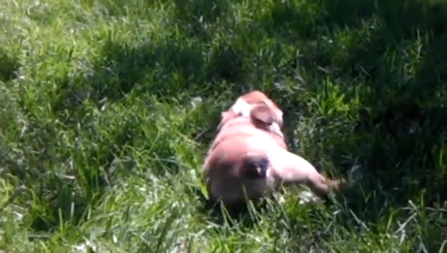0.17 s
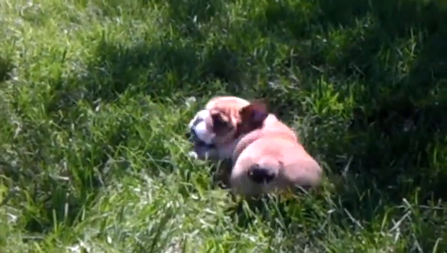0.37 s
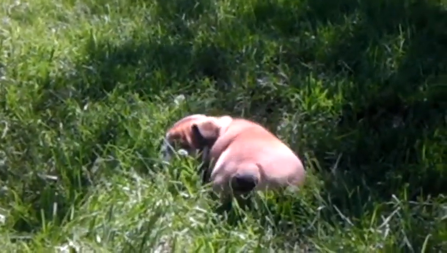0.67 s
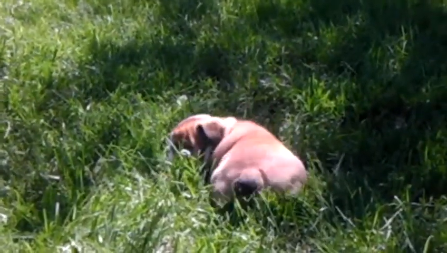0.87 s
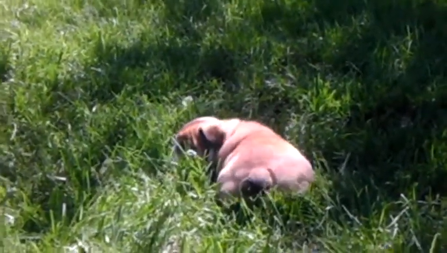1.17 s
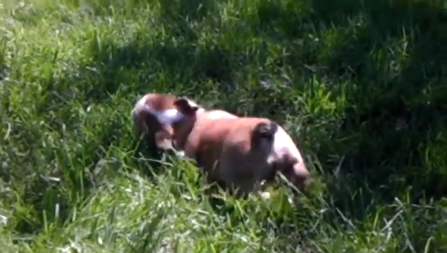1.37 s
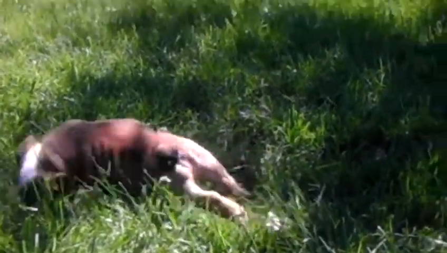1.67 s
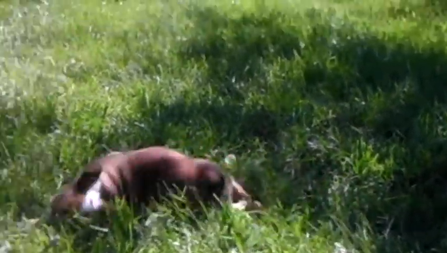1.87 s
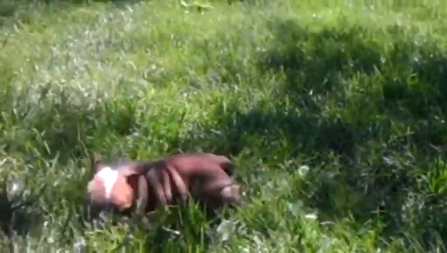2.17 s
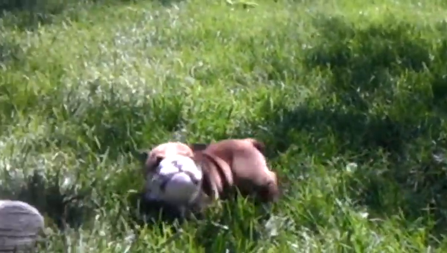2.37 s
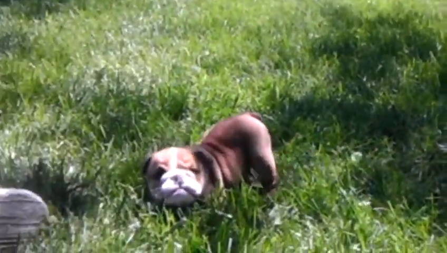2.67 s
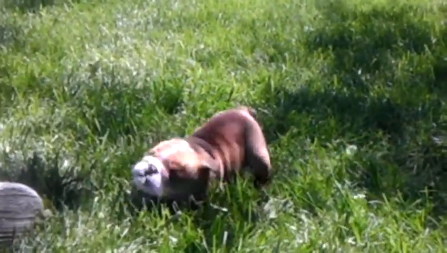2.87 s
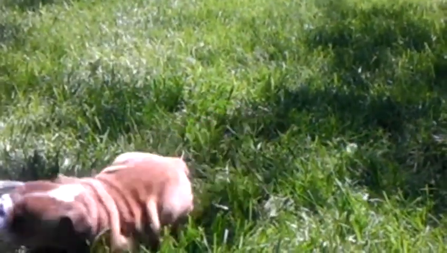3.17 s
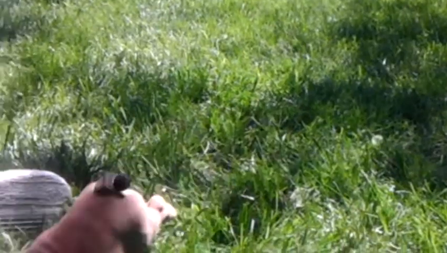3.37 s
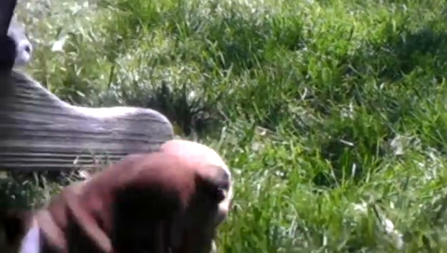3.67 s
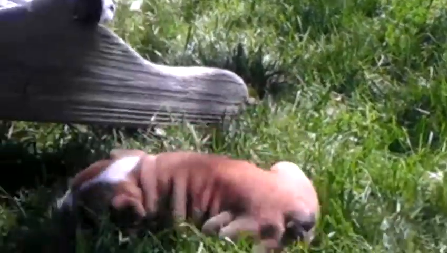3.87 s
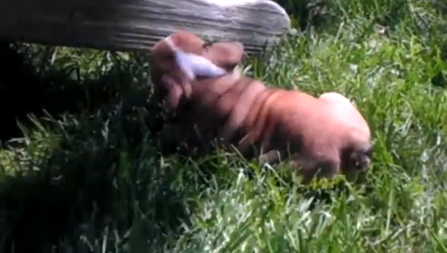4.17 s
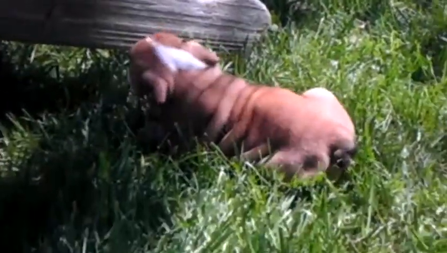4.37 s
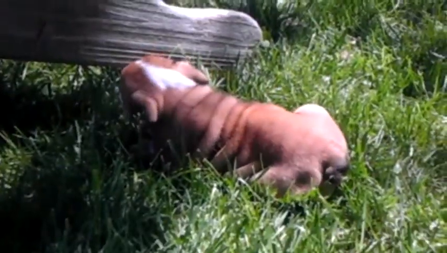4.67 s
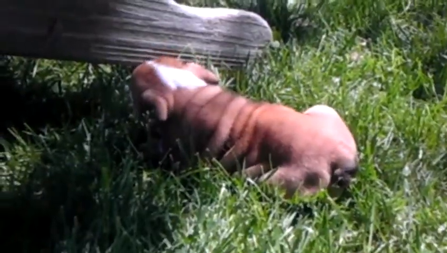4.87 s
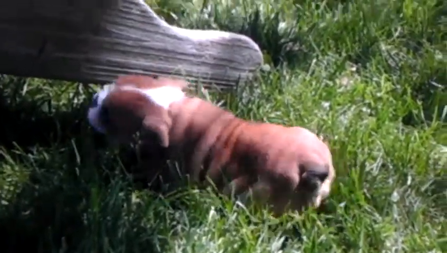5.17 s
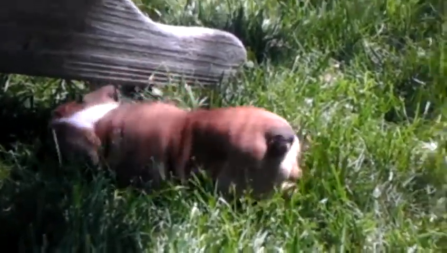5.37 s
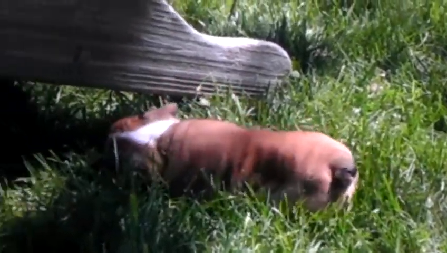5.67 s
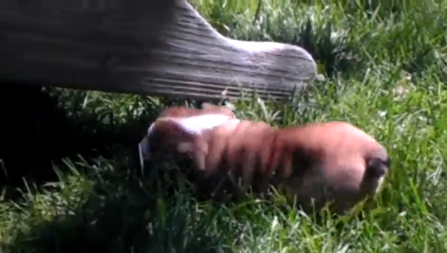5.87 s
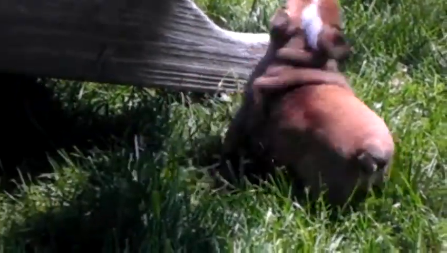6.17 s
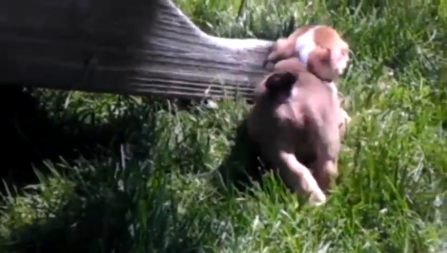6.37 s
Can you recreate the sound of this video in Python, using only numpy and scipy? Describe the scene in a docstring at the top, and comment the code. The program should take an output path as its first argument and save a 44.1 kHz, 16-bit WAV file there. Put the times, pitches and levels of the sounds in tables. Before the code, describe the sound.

A quiet garden, heard through a close handheld stereo microphone: steady low, far traffic and a soft wash of air and leaves. From the start, faint grainy swishes of grass against fur come and go, with a small dull tap at 0.5 s. At about 1.35 s a puppy gives one very short, high yap, only a tenth of a second, rising quickly and cracking into a rough squeak before dropping; a faint echo trails off the garden. Grass rustles continue at 1.6 to 2.5 s and around 3.1 s. From about 3.5 to 4.6 s a distant engine putters in low, muffled, slowing pulses, with a crisper swish near 4.1 s. Tiny ticks lead to a sharp, hollow wooden knock at 5.3 s, right of centre. Gentle breeze buffets the microphone near 5.9 and 6.3 s, then a thud, brief claw scuff on wood and rustle at 6.45 s.

```python
"""Puppy barks on a lawn

A puppy barks once, close by; a wall and the garden answer with a short echo. The bark is a sum of
overtones shaped by mouth, throat and chest. Shaped noise makes far traffic, air, breeze and swishing
grass; noise puffs ring the exhaust of a distant engine; damped sines knock and tick; a claw scuffs wood."""
import sys
import numpy as np
from scipy import signal
from scipy.fft import rfft, irfft, next_fast_len
from scipy.io import wavfile
from scipy.ndimage import uniform_filter1d, map_coordinates

SR = 44100
rng = np.random.default_rng(int(sys.argv[2]) if len(sys.argv) > 2 else 0)


def dump(signal):
    """Clip the signal to [-1, 1] and save it as 16-bit WAV at the path in sys.argv[1]."""
    limited = np.clip(np.atleast_2d(signal).T, -1, 1)
    pcm = np.round(limited * 32767).astype(np.int16)
    wavfile.write(sys.argv[1], SR, pcm)


N = 287973


def amp(db):
    """Gain of a level in dB."""
    return 10 ** (np.asarray(db) / 20)


def unit(x):
    """x at rms 1."""
    return x / np.sqrt(np.mean(np.abs(x) ** 2) + 1e-20)


def along(points, hz):
    """(Hz, value) points interpolated on a log frequency axis."""
    f, v = np.transpose(points)
    return np.interp(np.log(hz + 1), np.log(f + 1), v)


def curves(rows):
    """One value per sample for each column after the time."""
    s, *cols = np.transpose(rows)
    return [np.interp(np.arange(N) / SR, s, c) for c in cols]


def wobble(rate_hz, size=N):
    """A smooth random curve with rate_hz knots a second."""
    knots = rng.standard_normal(int(size * rate_hz / SR) + 4)
    return map_coordinates(knots, [np.arange(size) * rate_hz / SR])


def swells(s, half_s, db):
    """Summed gain of bell-shaped swells."""
    t = np.arange(0, N / SR + .002, .002)[:, None]
    bells = np.exp(-.5 * ((t - s) / half_s) ** 2)
    return curves(np.c_[t, bells @ amp(db)])[0]


def filtered(x, response):
    """x through a complex response of frequency."""
    m = next_fast_len(N + SR // 2)
    return irfft(rfft(x, m) * response(np.fft.rfftfreq(m, 1 / SR)), m)[..., :N]


def resonances(modes, hz):
    """Causal response of (Hz, width Hz, dB) modes, alternating in sign."""
    return sum((-1) ** k * amp(db) * 1j * hz * w / (c * c - hz * hz + 1j * hz * w)
               for k, (c, w, db) in enumerate(modes))


def rush(spectrum, patchy_db):
    """Stereo noise of rms 1 with time-frequency patches of random gain."""
    # left-right likeness: (frequency [Hz], correlation [0-1])
    likeness = [(60, 0.99), (130, 1), (290, 0.87), (630, 0.53), (1380, 0.042), (3020, 0.2), (6620, 0.039),
                (14500, 0.17)]
    z = signal.stft(rng.standard_normal((2, N)), nperseg=512)[2]
    field = rng.standard_normal(z.shape[1:])
    field = uniform_filter1d(uniform_filter1d(field, 6, 0), 10, 1)
    pair = signal.istft(z * amp(patchy_db * unit(field)), nperseg=512)[1][:, :N]

    def mid_side(hz):
        turn = np.arccos(np.clip(along(likeness, hz), -1, 1)) / 2
        return amp(along(spectrum, hz)) * [np.cos(turn), np.sin(turn)]

    mid, side = filtered(pair, mid_side)
    return unit(np.array([mid + side, mid - side]))


def bark():
    """Vocal fold overtones through mouth, throat and chest; period doubling adds lines halfway."""
    # voice: (time [s], pitch [Hz], mouth resonance [Hz], throat level [dB], chest level [dB])
    voice_rows = [(1.353, 350, 1740, -62, -45), (1.363, 364, 1770, -33, -29), (1.369, 394, 1600, -21, -27),
                  (1.388, 455, 1370, -19, -32), (1.400, 512, 1270, -22, -40), (1.421, 556, 1300, -24, -48),
                  (1.430, 519, 1290, -25, -45), (1.437, 500, 1260, -28, -45), (1.448, 517, 1290, -27, -45),
                  (1.459, 490, 1330, -44, -42), (1.468, 370, 1400, -52, -33), (1.484, 300, 1400, -70, -58)]
    # mouth ring, surging once the voice breaks: (time [s], level [dB])
    ring_rows = [(1.353, -57), (1.356, -24), (1.362, -13), (1.370, -9), (1.379, -14.5), (1.388, -8.5),
                 (1.394, -11.5), (1.400, -19), (1.409, -17), (1.4265, -19), (1.430, -5), (1.433, -13),
                 (1.437, -12), (1.440, -23), (1.446, -9), (1.455, -25), (1.484, -70)]
    # upper resonances: (frequency [Hz], width [Hz], relative level [dB])
    throat_modes = [(2850, 330, -1.5), (4250, 280, 0), (4900, 300, -7), (5950, 700, -7), (7500, 700, -13.5)]
    break_s, break_over_s, mend_s = 1.424, .008, 1.455  # period doubling sets in, over, until
    strain_s, first_doubling, strained_doubling = 1.395, .07, .4  # doubling 0-1, rising to the break
    throat_scale = .87  # on the throat's resonant frequencies below 5 kHz, after the break
    base_rough, rough_per_db, firm_db = .04, .018, -13  # roughness grows as the ring sinks below firm_db

    on = slice(int(voice_rows[0][0] * SR), int(voice_rows[-1][0] * SR))
    smooth = [uniform_filter1d(c, size=60)[on] for c in curves(voice_rows) + curves(ring_rows)]
    pitch, mouth, throat_db, chest_db, mouth_db = smooth
    broken_s = break_s + break_over_s / 2
    doubling = curves([(strain_s, first_doubling), (break_s, strained_doubling), (broken_s, 1),
                       (mend_s - break_over_s, 1), (mend_s + break_over_s, 0)])[0][on]
    stretch = curves([(broken_s - break_over_s, 1), (broken_s, throat_scale)])[0][on]
    rough = base_rough + np.clip(rough_per_db * (firm_db - mouth_db), 0, .2) * doubling

    k = np.arange(1, 50)[:, None] / 2  # whole: overtones; half: lines of the doubled period
    hz = k * pitch
    source = np.where(k % 1, np.clip(doubling, 0, 1), 1)

    # mouth resonance squared, steep below: dark valleys
    ring = np.abs(resonances([(mouth, 380 - 170 * doubling, 0)], hz)) ** 2
    ring = ring / (1 + (900 / hz) ** 8)

    throat = np.abs(resonances(throat_modes, np.where(hz < 5000, hz / stretch, hz))) ** 2
    throat = (throat + amp(-25.0) * (hz < 5500)) * (hz > 2100) * (hz < 8400)
    throat = throat * amp(4 * doubling * (hz > 5000))  # the doubled voice is harsher
    flicker_db = 3 * np.array([wobble(70, size=len(pitch)) for _ in k])
    throat = throat * amp(flicker_db)  # each high overtone comes and goes

    chest = np.abs(resonances([(385, 55, -3), (760, 420, 0)], hz)) ** 1.6
    chest = chest * (hz < 1150) * (k % 1 == 0)

    gain = 0
    for shape, db in [(ring, mouth_db), (throat, throat_db), (chest, chest_db)]:
        lines = source * shape
        gain = gain + amp(db) * lines / np.sqrt(np.sum(lines ** 2, 0) / 2 + 1e-9)

    # unsteady folds blur the high overtones by roughness, the lowest by doubling
    share = np.clip(rough * (1 + (hz / 1500) ** 2) + 2 * doubling * (hz < 700), 0, 1)
    smear = np.array([wobble(305.4, size=len(pitch)) + 1j * wobble(282.5, size=len(pitch)) for _ in k])
    carrier = np.exp(2j * np.pi * (k * np.cumsum(pitch) / SR + rng.random(k.shape)))
    blurred = (np.sqrt(1 - share) + np.sqrt(share / 2) * smear) * carrier
    out = np.zeros(N)
    out[on] = np.sum(gain * blurred.imag, 0)
    return out


def garden(x):
    """Echo from fences and trees: a noise tail whose frequencies each die at their own speed."""
    # decay: (frequency [Hz], t60 [s])
    decay = [(300, .15), (1300, 0.63), (3000, 0.59), (8000, 0.13)]
    hz, t, z = signal.stft(rng.standard_normal((2, SR // 2)), SR, nperseg=256)
    fade = amp(-60 * t / along(decay, hz)[:, None])
    tail = signal.istft(z * fade, SR, nperseg=256)[1]
    late = np.pad(x, (700, 0))[None]  # 16 ms later
    return signal.fftconvolve(late, tail / np.linalg.norm(tail[0]), axes=1)[:, :N]


def knocks():
    """Knocks and twig ticks: a short ring sags in pitch as the contact softens, over a lower body mode."""
    # (time [s], peak level [dB], settled pitch [Hz], t60 [s], left minus right [dB])
    hits = [(0.520, -42, 1200, 0.0068, 0), (1.165, -47, 3000, .006, -4), (1.947, -40, 2830, 0.0027, -7),
            (3.57, -44, 3200, .006, 0), (4.132, -44, 4300, 0.0068, -3), (4.405, -47, 4100, 0.0081, -3),
            (4.67, -53, 3790, .006, -4), (5.157, -51, 9200, 0.0089, 2), (5.272, -17.5, 964, 0.0074, -9),
            (5.364, -46, 3300, 0.004, -3), (6.460, -34, 280, 0.013, -2), (7.3, -45, 6500, 0.004, -3)]
    out, t = np.zeros((2, N + SR)), np.arange(SR // 10) / SR
    for s, db, hz, t60_s, pan_db in hits:
        turns = hz * t + 0.66 * (1 - np.exp(-t / 0.00023))
        body = 0.37 * np.sin(2 * np.pi * 0.6 * hz * t) * (1 - np.exp(-t / 0.0018))
        ring = (np.sin(2 * np.pi * turns) + body) * amp(-60 * t / t60_s)
        ring *= (1 - np.exp(-t / 0.001)) ** 2  # soft onset
        snap = 0.023 * np.sin(2 * np.pi * 2.54 * hz * t) * amp(-60 * t / 0.0047)
        ring += snap * (hz < 2000)  # low-pitched knocks only
        sides = amp([[db + pan_db / 2], [db - pan_db / 2]])
        out[:, round(s * SR):][:, :len(t)] += sides * ring / np.abs(ring).max()
    return out[:, :N]


def grass():
    """Blades brush the fur: a hiss over a lower rustle, both grainy, on a faint constant stir."""
    # (time [s], half length [s], hiss [dB], rustle over hiss [dB], top of hiss over its rest [dB])
    swishes = [(0.01, 0.033, -57.5, 0, 0), (0.21, 0.066, -57, -2, 0), (0.373, 0.064, -51, -8, -5),
               (.53, .03, -58.5, 3, 5), (.75, 0.015, -59.5, -5, -2), (1.17, 0.018, -65.5, 4, 2.5),
               (1.32, .03, -59, 1, 2), (1.63, .03, -52.5, -5.5, -4), (1.84, .06, -53, -2.5, -1),
               (2.14, .035, -54.5, -1, 3.5), (2.28, .04, -53.5, -2.5, 5.5), (2.5, .04, -61.5, 0, -2),
               (2.645, 0.018, -62.5, 6.5, 0), (2.963, 0.015, -63.5, 0, 0), (3.147, 0.047, -52.5, -2, 0.5),
               (3.46, .15, -53.5, -6.5, -1), (3.914, 0.036, -56, -4, -0.5), (4.093, 0.027, -48.5, -6, 1),
               (4.413, 0.12, -65, 8, 3.5), (4.661, .03, -64, 4, 2), (4.936, .03, -69, -10, 2),
               (5.155, 0.017, -61.5, -15, -2.5), (5.363, .1, -62.5, 5, 4), (6.142, 0.18, -65.5, -9, 3),
               (6.453, .03, -53, -2, -2.5)]
    # hiss spectrum: (frequency [Hz], relative density [dB per Hz])
    hiss_spectrum = [(1470, -33.5), (2500, -6.5), (4020, -1.5), (6710, -4.5), (7530, -5.5), (10400, -5),
                     (14000, -5.5)]
    rustle_spectrum = [(200, -37.5), (600, 4.5), (2000, -5.5), (5000, -13.5), (9000, -42)]
    stir_db, stir_rustle_over_hiss_db = -68, 4.5
    hiss_top_hz = 9400  # where the top of the hiss begins
    s, half_s, db, low_db, top_db = np.transpose(swishes)
    stir = amp(stir_db + 2.3 * wobble(11))
    grains = amp(1.23 * wobble(140) + 0.61 * wobble(25))
    hiss = unit(grains * rush(hiss_spectrum, patchy_db=1.8))
    top = filtered(hiss, lambda hz: 1 / (1 + (hiss_top_hz / (hz + 1)) ** 8))
    rustle = unit(grains * rush(rustle_spectrum, patchy_db=1.5))
    out = stir * (hiss + amp(stir_rustle_over_hiss_db) * rustle)
    out = out + swells(s, half_s, db) * (hiss - top)
    out = out + swells(s, half_s, db + top_db) * top
    return out + swells(s, half_s, db + low_db) * rustle


def scuff():
    """A claw drags briefly over wood: grainy noise through the wood's modes."""
    # (frequency [Hz], width [Hz], relative level [dB])
    wood_modes = [(950, 210, 2.5), (1460, 930, -3.5), (1880, 440, -1.5), (3530, 730, -11)]
    start_s, hold_s, level_db = 6.44, .012, -39
    rise_db_per_s, fall_db_per_s = 4997, 1600
    grains = amp(4.3 * wobble(600)) * rng.standard_normal(N)
    noise = unit(filtered(grains, lambda hz: resonances(wood_modes, hz)))
    t = np.arange(N) / SR - start_s
    db = level_db + rise_db_per_s * np.minimum(t, 0) - fall_db_per_s * np.maximum(t - hold_s, 0)
    return amp(db) * noise * amp([[-1.5], [1.5]])  # right of centre


def putter():
    """A distant engine slows: each firing is a noise puff ringing the exhaust, blurred by a noise drone."""
    # drive levels ahead of the exhaust: (time [s], firing [dB], thump [dB], blur between firings [dB])
    engine_rows = [(3.0, -45, -32, -72), (3.45, -38, -29, -46), (3.62, -36, -31, -42.5),
                   (3.72, -33, -21, -55), (3.93, -28.5, -27.5, -43), (4.05, -50, -22, -46),
                   (4.4, -41, -27, -37.5), (4.68, -49, -24.5, -45.5), (4.74, -45, -37, -61)]
    # exhaust, thump first: (frequency [Hz], width [Hz], relative level [dB])
    pipe_modes = [(255, 110, 3), (480, 170, -6), (790, 130, 2), (1050, 180, -3)]
    first_s, gap_s, gap_growth_s, firings = 3.459, .0312, .0003, 35
    jitter_s, scatter_db = .003, 2
    puffs, t = np.zeros((2, N + SR)), np.arange(SR // 10) / SR
    firing_db, thump_db, blur_db = curves(engine_rows)
    for k in range(firings):
        at_s = first_s + gap_s * k + gap_growth_s * k * k / 2 + rng.normal(0, jitter_s)
        at = round(at_s * SR)
        puff = t / 0.0046 * np.exp(1 - t / 0.0042) * rng.standard_normal(len(t))
        puff /= np.linalg.norm(puff) / 20
        drive_db = [[thump_db[at]], [firing_db[at]]] + rng.normal(0, scatter_db, (2, 1))
        puffs[:, at:][:, :len(t)] += amp(drive_db) * puff
    puffs[:, :N] += amp(blur_db + 3 * wobble(55)) * rng.standard_normal((2, N))

    def far(hz):
        """Distance dulls the treble."""
        return 1 / (1 + 1j * hz / 1500) ** 3

    thump = filtered(puffs[0, :N], lambda hz: resonances(pipe_modes[:1], hz) * far(hz))
    return thump + filtered(puffs[1, :N], lambda hz: 2 * resonances(pipe_modes[1:], hz) * far(hz))


def traffic():
    """Far traffic: low noise, its level slightly unsteady."""
    # (frequency [Hz], relative density [dB per Hz])
    rumble_spectrum = [(35, -42.5), (60, -22), (128, -0.5), (188, -2), (242, -2.5), (412, -21.5),
                       (511, -18), (612, -32.5), (900, -25.5), (1170, -38.5), (1980, -120)]
    level_db = -47 + 0.2 * wobble(.7) + 0.46 * wobble(8.2)
    return amp(level_db) * rush(rumble_spectrum, patchy_db=.5)


def air_wash():
    """A soft wash of air and leaves: noise of slowly changing level."""
    # spectrum: (frequency [Hz], relative density [dB per Hz])
    air_spectrum = [(180, -28.5), (300, -7), (401, -5.5), (510, -15), (800, -12.5), (1090, -11),
                    (1180, -14), (2550, -18), (6270, -30), (12900, -27), (14000, -29)]
    # (time [s], level [dB])
    level_rows = [(0.0, -54.5), (0.33, -51), (0.8, -53), (2.76, -54), (3.91, -50.5), (4.46, -53.5),
                  (4.75, -54), (6.53, -52)]
    level_db = curves(level_rows)[0] + 0.75 * wobble(4.316)
    return amp(level_db) * rush(air_spectrum, patchy_db=0.5)


def breeze():
    """A light breeze buffets the two microphone ports, partly each on its own; gusts swell over it."""
    # (time [s], half length [s], level [dB])
    gusts = [(1.17, 0.17, -54), (5.507, 0.048, -58), (5.9, .12, -49), (6.299, .12, -52.5)]
    breeze_db = -66.5
    spectrum = [(25, -44.0), (45, -20), (70, 6.0), (100, 2.5), (160, -47)]
    puffs = rng.standard_normal((2, N)) + 0.6 * rng.standard_normal(N)
    buffet = filtered(puffs, lambda hz: amp(along(spectrum, hz)))
    return (amp(breeze_db) + swells(*np.transpose(gusts))) * unit(buffet)


def scene():
    """The bark reaches two ports by slightly different paths, then off a wall and the garden."""
    # (frequency [Hz], left minus right [dB])
    port_balance = [(60, 4), (110, 3.5), (200, 4), (370, -0.5), (690, -2), (1270, -4), (2330, 3.5),
                    (4290, 2.5), (7890, -3), (14500, -2)]
    # (frequency [Hz], phase by which left leads [rad])
    port_lead = [(1000, 0.102), (1460, 0.26), (2240, 2.16), (2670, 0.56), (3270, 0.72), (5340, 0.9),
                 (8000, 1.8)]
    wall_s, wall_db = .105, -28.5  # a house wall returns the bark once
    bark_echo_db, knock_echo_db = -25.5, -22
    sideways = [(1300, -8.0), (2200, 9.5), (3300, 3.5), (4200, 0), (5800, 8.5)]  # bark as radiated sideways
    voice, taps = bark(), knocks()

    def ports(hz):
        left = amp(along(port_balance, hz) / 2) * np.exp(.5j * along(port_lead, hz))
        return left ** np.array([[1], [-1]])

    def wall(hz):
        return amp(wall_db) * np.exp(-2j * np.pi * hz * wall_s) / (1 + 1j * hz / 3000)

    near = filtered(np.array([voice, voice]), lambda hz: ports(hz) + wall(hz))
    airy = filtered(voice, lambda hz: amp(along(sideways, hz)))
    echo = amp(bark_echo_db) * garden(airy) + amp(knock_echo_db) * garden(taps[1])
    background = traffic() + air_wash() + breeze()
    return near + echo + taps + grass() + scuff() + putter() + background


def record(dry):
    """Nothing above the band limit passes."""
    top_hz = 14000
    return filtered(dry, lambda hz: hz < top_hz)


dry = scene()
out = record(dry)
dump(out)
```